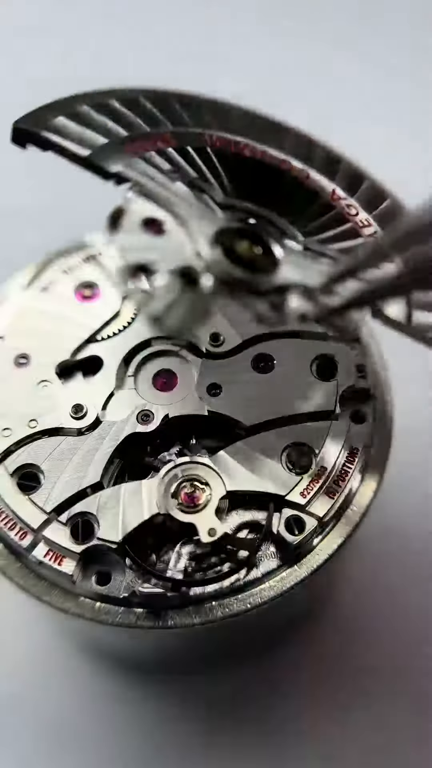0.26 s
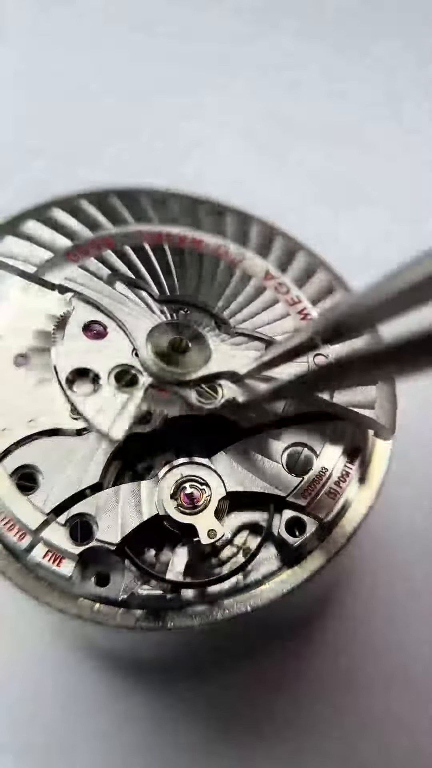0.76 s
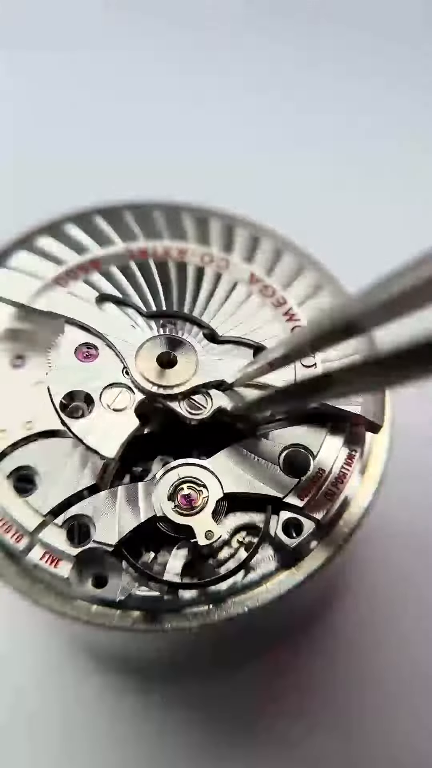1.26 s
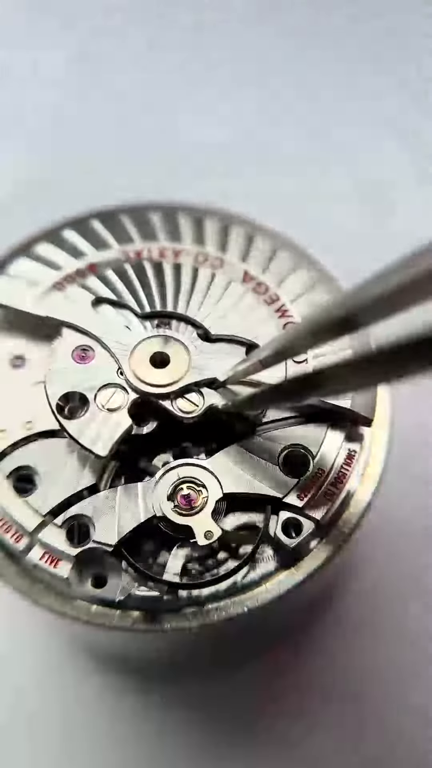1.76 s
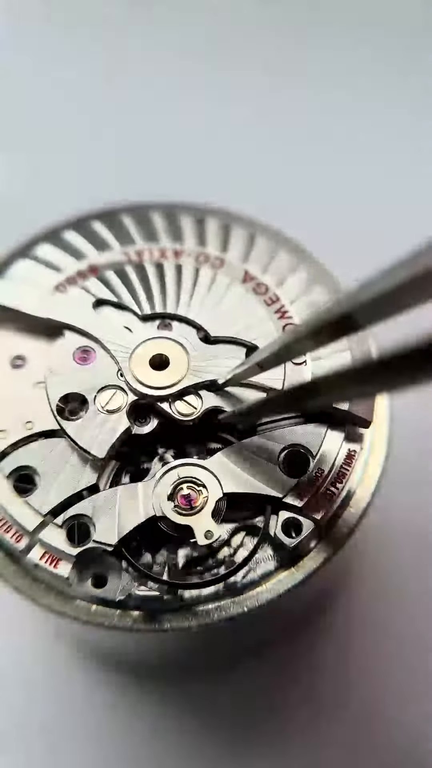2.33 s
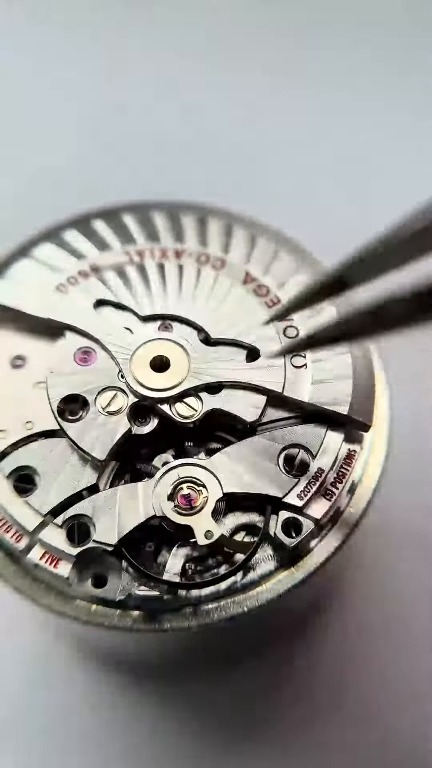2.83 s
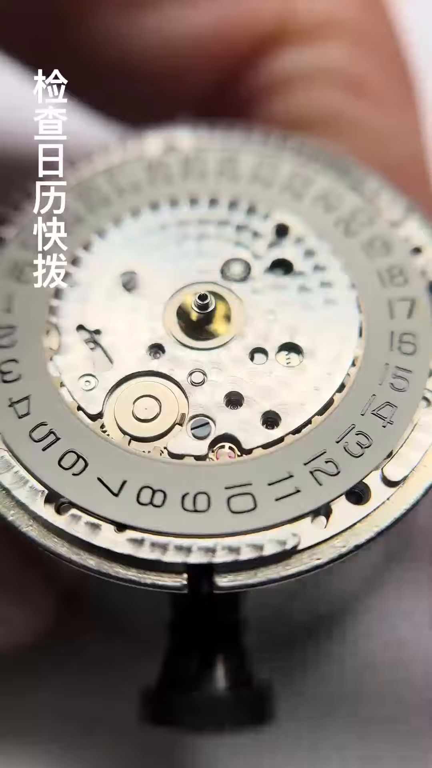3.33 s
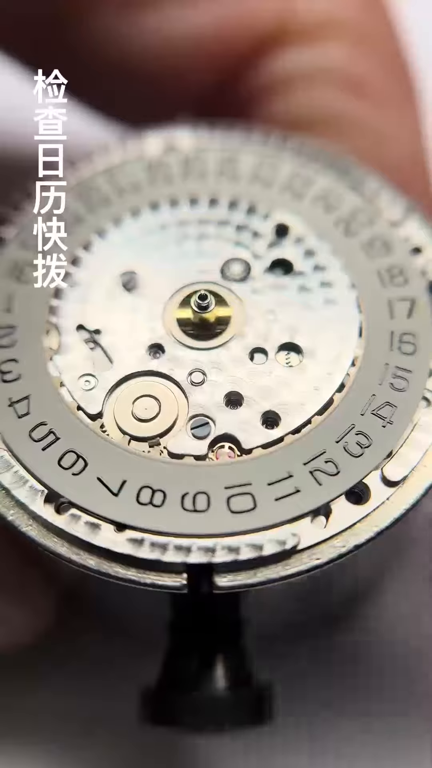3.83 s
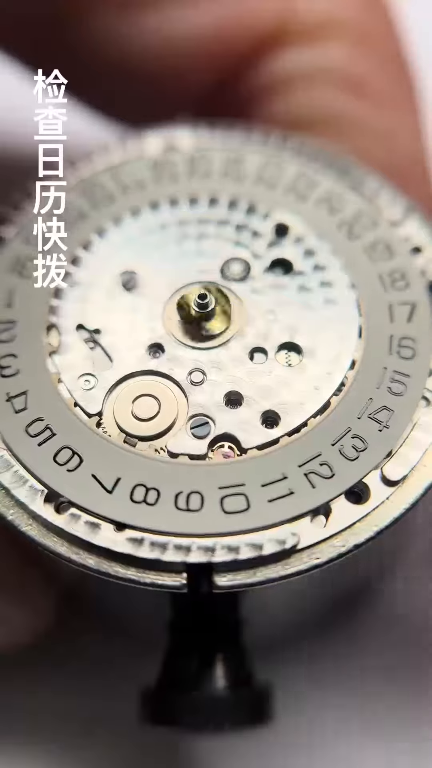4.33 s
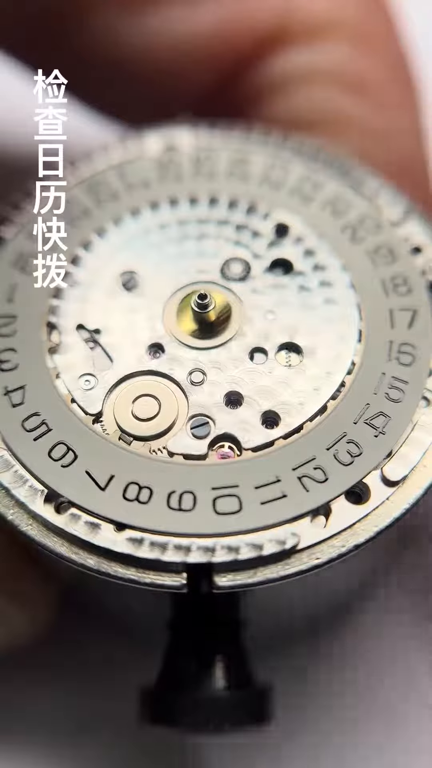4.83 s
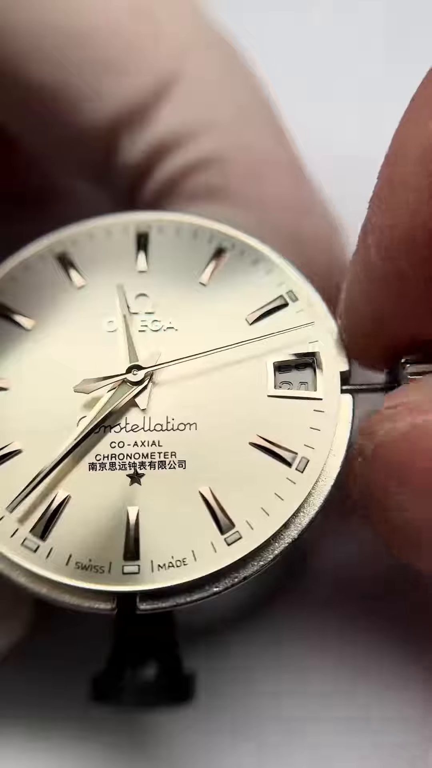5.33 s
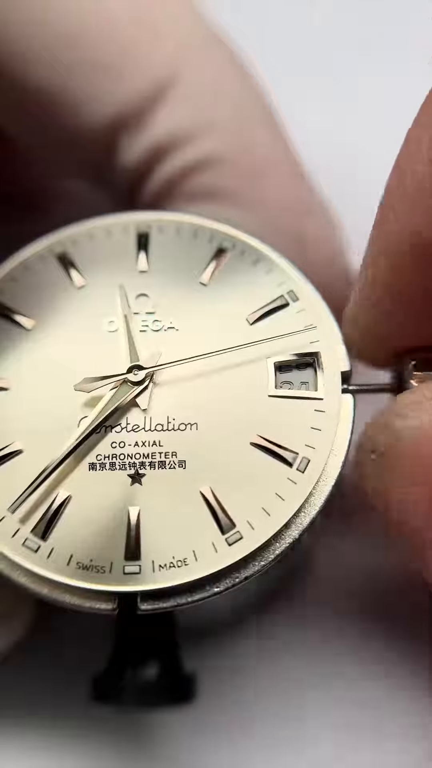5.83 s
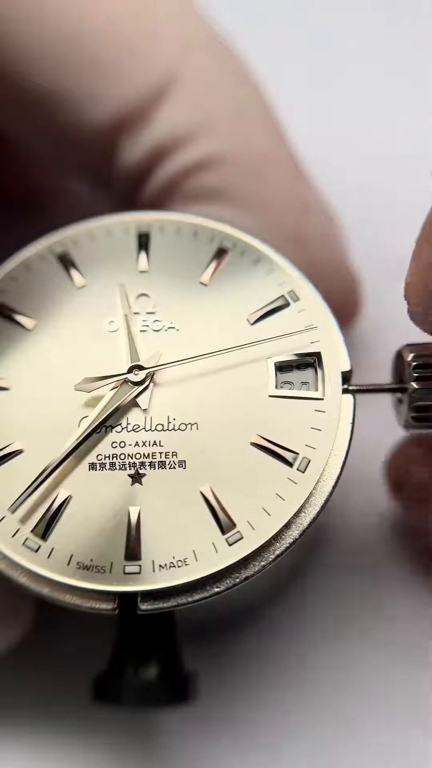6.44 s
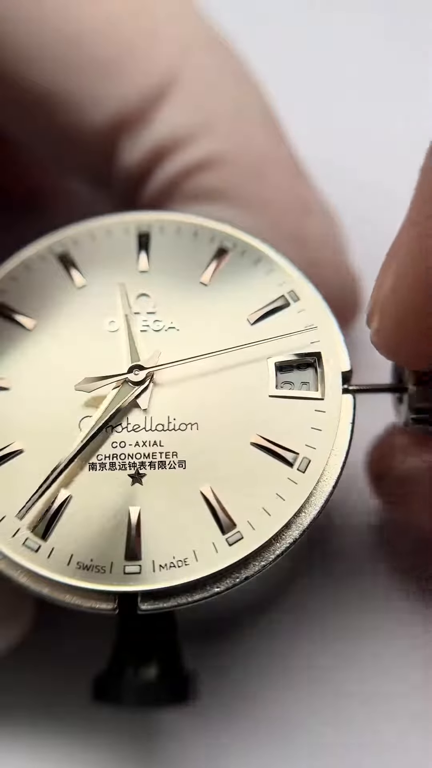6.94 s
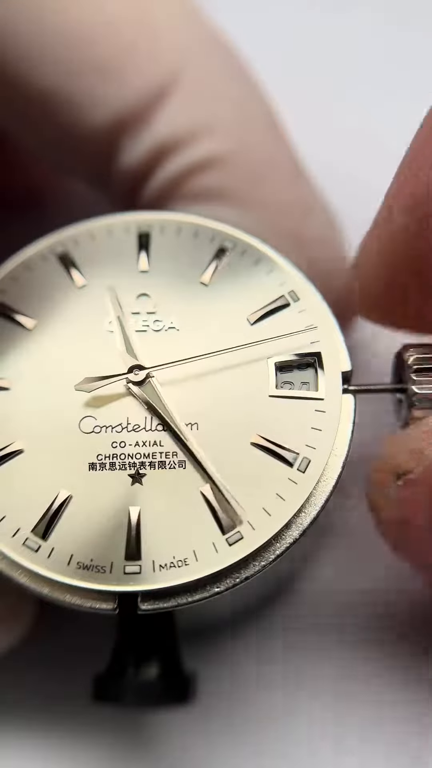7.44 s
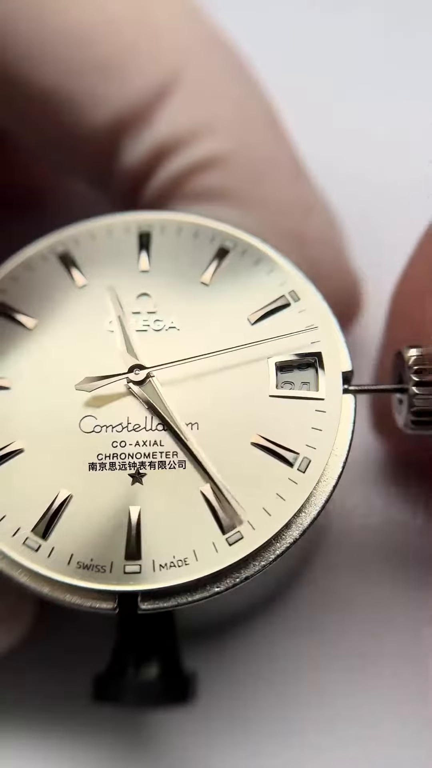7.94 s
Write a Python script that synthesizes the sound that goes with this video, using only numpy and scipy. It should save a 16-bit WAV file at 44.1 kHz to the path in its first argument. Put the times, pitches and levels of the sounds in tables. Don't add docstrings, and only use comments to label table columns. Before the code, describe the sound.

Close mono microphone in a dry, still room with a faint far fan. Delicate bright clinks, grazes and a short squeaky drag come irregularly over soft rapid ticking. Then small metal teeth snap past in bursts of four or five, with dull thumps from the hand-held holder between. Finally a single loud, very short metal snap, followed by soft skin rubs and barely audible ticks.

```python
import sys
import numpy as np
from scipy import signal
from scipy.fft import rfft, irfft
from scipy.io import wavfile
from scipy.ndimage import uniform_filter1d

SR = 44100
rng = np.random.default_rng(int(sys.argv[2]) if len(sys.argv) > 2 else 0)


def wav_record(signal):
    frames = np.transpose(np.atleast_2d(signal))
    bounded = np.clip(frames, -1, 1)
    quanta = np.round(bounded * 32767).astype(np.int16)
    wavfile.write(sys.argv[1], SR, quanta)


def field_ratio(decibels):
    return 10 ** (np.asarray(decibels, dtype=float) / 20)


N = 361179
T = np.arange(N) / SR
HZ = np.maximum(np.arange(N // 2 + 1) * SR / N, 1)

# [t/s, peak level/dB, low modes/dB, high modes/dB, rebound peak level/dB]
TEETH = [(2.9784, -22.5, -0.5, -1.5, -50), (3.024, -21.5, -2, -1, -38), (3.0618, -18.5, 3, 4, -39),
         (3.0931, -19.5, -1.5, 4.5, -40), (3.145, -23, 0, -1, -64), (3.5668, -23, 0, 7, -48),
         (3.5993, -20.5, 3.5, 2.5, -52), (3.6254, -21.5, -3, -2, -48), (3.659, -21.5, -3, -3, -48),
         (4.148, -24, 3, 4, -48), (4.2025, -23.5, 4, 3.5, -58), (4.2543, -20, 4.5, 0, -42),
         (4.3009, -20.5, -7, -3, -45), (4.368, -21.5, 1.5, 1.5, -56), (4.866, -18, 4, -4, -48),
         (4.9248, -20, -1.5, 2.5, -53), (4.9747, -21, -10, 5, -44), (5.0309, -22, 1, 3.5, -61),
         (5.113, -20.5, -7.5, -3.5, -63)]
# [stop t/s, restart t/s, fade-in/s]
CHANGES = [
    (2.923, 2.935, .03),
    (5.206, 5.22, .022),
]


def shaped(gain):
    spectrum = rng.standard_normal((len(HZ), 2)) @ [1, 1j]
    x = irfft(spectrum * gain, N)
    return x / x.std()


def colour(points):
    hz, db = np.transpose(points)
    return field_ratio(np.interp(np.log(HZ), np.log(hz), db, left=-150, right=-150))


def resonance(hz, width):
    return 1 / np.sqrt(1 + ((HZ - hz * hz / HZ) / width) ** 2)


def band(lo_hz, hi_hz):
    return 1 / np.sqrt((1 + (lo_hz / HZ) ** 8) * (1 + (HZ / hi_hz) ** 8))


def walk(rate):
    hold = int(SR / rate)
    steps = np.repeat(rng.standard_normal(N // hold + 1), hold)
    return uniform_filter1d(steps, hold)[:N]


def stroke(start, end):
    return np.sin(np.pi * np.clip((T - start) / (end - start), 0, 1))


def scene_index():
    return np.searchsorted([stop for stop, *_ in CHANGES], T)


def add(out, s, sound):
    i = int(s * SR)
    out[i:i + len(sound)] += sound[:N - i]


def contacts(rows, modes, tail_db, tail_s, seats=None):
    out, size = np.zeros(N), 4096
    lead = 200
    t = T[:size]
    hz, width, mode_db = (c[:, None] for c in np.transpose(modes))
    rate = 1.55 * np.pi * width
    dull = field_ratio(-5 * (hz[:, 0] > 9000))
    noise = rng.standard_normal((len(rows), 2 * size + 2 * len(modes)))
    seats = seats or [(0.98, 0.99, 0, 0)] * len(rows)
    for row, grit, (bend, mid_bend, third_db, after_db) in zip(rows, noise, seats):
        s, peak_db, low_db, high_db, ms, mid_db = row
        detune, strength = grit[2 * size:].reshape(2, -1, 1)
        regions = [hz < 2400, hz < 3000, hz < 6500, hz > 9000]
        tilt_db = np.select(regions, [low_db, low_db + third_db, mid_db, high_db]) + 1.5 * strength

        level = field_ratio(mode_db + tilt_db + after_db * (width < 30))
        swelling = level * rate ** 2 * t * np.exp(-rate * t)
        pitch = hz * np.select([hz < 2400, hz < 6500], [bend, mid_bend], 1)
        pitch = pitch + np.minimum(.012 * hz, width / 2) * detune
        rings = rfft(swelling * np.sin(2 * np.pi * pitch * t))

        u = t / (max(ms, .05) / 3000)
        blow = rfft(u * np.exp(1 - u) * grit[:size])
        power = np.abs(blow) ** 2
        blow = blow / np.sqrt(uniform_filter1d(power, size=31) / power.mean() + .15)
        rattle = rfft(field_ratio(tail_db) * np.exp(-t / tail_s) * grit[size:2 * size])

        ring_power, blow_power = np.abs(rings) ** 2, np.abs(blow) ** 2
        share = np.sqrt(blow_power.mean() * ring_power.sum(axis=1) / (ring_power @ blow_power))
        sound = irfft(blow * (share @ rings) + rattle * (dull @ rings))
        sound = np.roll(sound, lead)
        sharpest = sound[np.abs(sound).argmax()]
        add(out, s - lead / SR, -sound * field_ratio(peak_db) / sharpest)
    return out


def room():
    # [f/Hz, level per Hz/dB]
    air = [(41, -31.5), (70, -7.5), (152, -9), (351, -8.5), (431, -5), (635, -8.5), (744, -5.5), (853, -9),
           (1580, -20), (1930, -18), (2600, -29), (14900, -29), (16000, -39)]
    # [f/Hz, width/Hz, rms level/dB]
    fan_tones = [(147, -70.5), (762, 24, -74)]
    (low_hz, low_db), (hz, width, db) = fan_tones
    low = np.sin(2 * np.pi * np.cumsum(low_hz + 1.5 * walk(20)) / SR)
    low = low * field_ratio(low_db + 1.4 * walk(3.9))
    low_scene_db = np.array((-22, 2, -0.5))
    fan = low * field_ratio(low_scene_db[scene_index()]) + field_ratio(db) * shaped(resonance(hz, width) ** 2)
    return field_ratio(-68 + 1.0 + 0.51 * walk(2.5)) * shaped(colour(air)) + fan


def hands():
    # [t/s, sway level/dB]
    sway_points = [(0, -62.5), (.3, -60), (.7, -64), (.85, -63.5), (1.12, -63), (1.3, -64.5), (2.8, -59),
                   (3.08, -49.5), (3.36, -53), (3.6, -48.5), (4.1, -51.5), (4.27, -49), (4.55, -49),
                   (5.02, -51), (5.47, -54.5), (7.2, -59.5), (7.6, -56), (7.85, -61)]
    # [start t/s, end t/s, rub level/dB, airy top level/dB]
    slides = [(-.25, 0.343, -72.5, -65), (0.137, 0.738, -69, -74), (1.112, 1.813, -69, -76),
              (1.697, 2.106, -65, -68), (2.05, 2.45, -72, -77), (2.5, 2.85, -71, -72),
              (2.72, 3.057, -64, -61), (3.15, 3.433, -77.5, -73), (4.35, 4.73, -73, -81),
              (4.513, 4.595, -80, -63), (5.194, 5.33, -68, -64), (5.234, 5.578, -72, -67),
              (5.55, 5.72, -68, -95), (5.672, 5.987, -67.5, -57), (5.956, 6.114, -73.5, -75),
              (6.19, 6.599, -73.5, -75), (7.298, 7.529, -75, -72), (7.903, 8.299, -76, -91)]
    # [f/Hz, level per Hz/dB]
    skin = [(1000, 9), (1700, -0.5), (2600, -2.5), (3400, -2.5), (4400, -3.5), (6200, -3.5), (7400, -3.5),
            (8500, -2), (9800, -12.5), (12000, -9.5), (14100, -8.5), (15700, -11)]
    index = scene_index()
    grip_db = np.array((-63, -66.5, -78.5))
    rest_db = np.array([(-72, -77.5, -78), (-83, -78, -90)])

    sway = field_ratio(np.interp(T, *np.transpose(sway_points)))
    grip = np.hypot(field_ratio(grip_db[index]), sway * field_ratio(-15.5))
    rub, top = field_ratio(rest_db[:, index]) ** 2
    for start, end, rub_db, top_db in slides:
        swell = stroke(start, end) ** 2
        rub = rub + swell * field_ratio(rub_db) ** 2
        top = top + swell * field_ratio(top_db) ** 2
    grain = field_ratio(0.92 * walk(61))

    creak = band(89, 2100) * (HZ ** -.7 + 0.023 * resonance(262, 86))
    out = field_ratio(5.0) * sway * field_ratio(2.0 * walk(9.6)) * shaped(band(4.5, 70) * HZ ** -1.1)
    out += field_ratio(-1.0) * grip * field_ratio(2.0 * walk(25)) * shaped(creak)
    out += field_ratio(1.0) * np.sqrt(rub) * grain * shaped(band(1300, 5500) * colour(skin))
    out += field_ratio(-4.5) * np.sqrt(top) * grain * shaped(band(6500, 18000) * colour(skin))
    return out


def escapement():
    # [first beat t/s, end t/s]
    runs = [
        (.0458, 2.92),
        (3.032, 5.2),
    ]
    # [f/Hz, width/Hz, level/dB]
    modes = [(4300, 490, -42), (7700, 860, 13), (9400, 3100, 15), (12740, 960, 20.5), (12370, 4400, 24.5),
             (15000, 1600, -3.5), (12200, 45, -10)]
    beat_s, limp_s = 1 / 7, .002
    rows = []
    for (first, end), db in zip(runs, (-52, -47)):
        for k, s in enumerate(np.arange(first, end, beat_s)):
            s += limp_s * (k % 2)
            rows.append((s, db, 0, 0, 1.5, 0))
            rows.append((s + 0.0028, db - 17, 0, 0, 2.5, 0))
    return contacts(rows, modes, tail_db=-1.5, tail_s=0.0057)


def tweezers():
    # [t/s, peak level/dB, low modes/dB, high modes/dB, middle modes/dB]
    taps = [(0.4904, -23, -18, -2.5, -4), (0.4937, -30, -3, 2, 8), (0.7981, -43.5, 6, -3, 3),
            (0.8126, -24.5, -4, 3, 5), (1.1747, -47, 2, -11, -4), (1.6743, -36.5, 11, -1, 5),
            (1.6787, -29, -1.5, -6, 0.5), (1.683, -24, -4.5, -2.5, 3.5), (2.0466, -35.5, 2, -8, 1.5),
            (2.2016, -31, -4, -6, -3), (2.206, -33.5, 2, 0, 2), (2.209, -48, -2, -9, 1),
            (2.236, -28.5, -16, -12, -5), (2.2434, -29, -18, -3, -1), (2.2523, -24, -1.5, 2, 3.5),
            (2.2594, -31.5, 8, 7, 10), (2.263, -44, 8, -9, 4), (2.3501, -32, 0.5, 3, 5.5),
            (2.589, -41, 5, -14, 7.5), (2.6212, -47.5, -1, -4, 2)]
    tap_ring_hz = [4130, 4200, 4250, 4300, 4000, 3900, 3900, 3830, 4000, 4000, 4000, 4000, 3960, 3900, 3850,
                   3900, 4000, 3840, 4000, 4000]
    # [t/s, peak level/dB, low modes/dB, high modes/dB]
    grazes = [(0.0774, -46.5, 9, 1), (.162, -54, -9, 12), (.174, -53, -9, 11), (.531, -56, -6, -10),
              (.61, -51, 9, -12), (0.7298, -48, 4, -10), (.7617, -50, 10, 7), (1.1628, -53, 0, -8),
              (1.416, -58, -13, -17), (1.452, -66, -13, -8), (2.3225, -54, -3, -8), (2.374, -45, 5, -9),
              (2.4219, -56, 2, 0), (2.6574, -50, -2, -9)]
    # [f/Hz, width/Hz, level/dB]
    modes = [(1500, 920, -3.5), (1876, 190, 1), (4000, 504, 3), (4450, 370, -7), (4800, 350, -12),
             (7560, 1120, -5.5), (12180, 590, -1.5), (13300, 1320, -7.5), (14900, 700, -61),
             (7900, 140, -10)]
    tap_ms, softer_ms_per_db, firm_db = 0.9, 1.2, -39.5
    rows = []
    for s, db, low_db, high_db, mid_db in taps:
        ms = tap_ms + softer_ms_per_db * max(firm_db - db, 0)
        rows.append((s, db, low_db, high_db, ms, mid_db))
    rows += [(*graze, 1.5, 2) for graze in grazes]
    seats = [(1, hz / 4000, 0, 0) for hz in tap_ring_hz]
    seats += [(0.95, 1, 0, 0)] * len(grazes)
    return contacts(rows, modes, tail_db=-10.5, tail_s=0.0029, seats=seats)


def knocks():
    # [t/s, peak level/dB, f/Hz, polarity]
    jolts = [(0.492, -39.5, 277, 1), (.722, -40.5, 260, 1), (0.736, -41, 267, -1), (0.749, -45, 264, 1),
             (0.813, -42, 263, 1), (1.683, -37, 247, -1), (2.047, -40, 262, 1), (2.201, -43, 280, 1),
             (2.237, -39, 292, -1), (2.253, -36, 310, 1), (3.076, -38, 153, 1), (3.105, -40, 174, 1),
             (3.107, -40.5, 470, 1), (3.147, -38, 493, -1), (3.466, -64, 60, -1), (3.477, -29, 28, 1),
             (3.479, -32.5, 463, 1), (3.635, -36, 480, 1), (3.768, -38.5, 483, 1), (4.021, -25.5, 35.8, 1),
             (4.302, -41, 520, 1), (4.446, -39, 211, -1), (4.462, -43, 218, 1), (4.598, -39, 90, -1),
             (4.753, -33, 49, 1), (4.773, -37.5, 69.6, -1), (4.978, -40, 507, 1), (5.572, -37, 29.9, 1),
             (5.57, -36.5, 75, -1), (7.94, -49, 60, 1), (7.48, -47.5, 89.8, 1)]
    out, t = np.zeros(N), T[:8192]
    for s, db, hz, sign in jolts:
        push = 1 - np.exp(-t / 0.001)
        swing = np.cos(2 * np.pi * hz * t) * np.exp(-t * (hz * 0.62 + 75)) * push
        add(out, s, np.sign(sign) * field_ratio(db) * swing)
    load_db, load_s, release_s = -41, .011, 0.004
    lag = t - t[-1] / 2
    lean = -field_ratio(load_db) * np.exp(-np.abs(lag) / np.where(lag < 0, load_s, release_s))
    for s, *_ in TEETH:
        add(out, s - t[-1] / 2, lean)
    return out


def brushes():
    # [start t/s, end t/s, rms
    # level/dB, f/Hz, width/Hz]
    touches = [(0.585, 0.64, -70, 4300, 900), (0.59, 0.648, -65, 1900, 600), (.71, 0.806, -71, 2280, 900),
               (5.214, 5.483, -72, 8400, 1500), (5.57, 5.652, -68, 4840, 1500),
               (5.698, 6.003, -64.5, 2620, 1900), (6.235, 6.283, -71.5, 2960, 2020),
               (6.351, 6.416, -73, 5300, 1500), (6.354, 6.41, -73, 8500, 2500),
               (6.48, 6.69, -73.5, 3150, 1210), (6.654, 6.968, -78, 3100, 2000),
               (7.127, 7.338, -74.5, 3100, 1600), (7.58, 7.616, -76, 5510, 4000),
               (7.34, 7.5, -71.5, 2500, 2000), (5.273, 5.53, -60, 90, 62.4),
               (3.517, 3.545, -68, 7500, 7000), (4.864, 4.888, -51, 1240, 350)]
    out = np.zeros(N)
    for start, end, db, hz, width in touches:
        out += field_ratio(db) * stroke(start, end) ** 0.54 * shaped(resonance(hz, width) ** 2)
    return out * field_ratio(2.0 * walk(87))


def drag():
    # [f/Hz, width/Hz, level/dB]
    modes = [(1270, 140, -1.5), (1315, 60, -14), (4000, 1700, -13), (7960, 1500, -16)]
    start_s, catch_s = 1.178, .012
    slacken_db_per_s = (140, 55, 70.4, 79)
    catch_db = -51.5 - 8 * (np.clip(start_s - T, 0, .1) / catch_s) ** 2
    late = np.maximum(T - start_s, 0)
    squeak = np.zeros(N)
    for (hz, width, db), fade in zip(modes, slacken_db_per_s):
        squeak += field_ratio(db - fade * late) * shaped(resonance(hz, width) ** 2)
    return squeak * field_ratio(catch_db + 3.1 * walk(69.8))


def date_ring():
    # [lowest ring f/Hz, third ring/dB, middle rings/dB, rebound delay/ms, after-ring/dB]
    seating = [(1600, -1, 1, 19, 0), (1690, 3.5, -0.5, 15, 6), (1840, 0.5, 0, 13.5, -2),
               (1650, 1, 0, 16, 2), (1560, 0, 3.5, 13, 0), (1540, -4, 1, 14, -4), (1610, -3, -1, 11, -3),
               (1700, 1, -2, 13, -6), (1570, 2, 2, 16, -10), (1640, 3, 2, 19, -6), (1660, -7, -1, 13, 0),
               (1750, 0.5, -1, 15, -2), (1820, -3, -8, 13, -8), (1530, -7, -2.5, 11, -10),
               (1904, -1.5, -7, 33, 0), (1560, -4, 0, 18, -1), (1590, -9, 3, 16, 2), (1660, 2, 0, 13, -5),
               (1580, 2.5, -0.5, 13, -12)]
    # [t/s, peak level/dB, low modes/dB,
    # high modes/dB]
    slips = [(3.1204, -51, -6, 8), (3.275, -50.5, 11, -6), (3.469, -34.5, 12.5, -17), (3.479, -36, 10, -8),
             (3.527, -45.5, 2, -6), (3.535, -49, 6, -7), (3.765, -46, -1, 0), (3.768, -44, 5, -5),
             (3.772, -51, 0, 0), (3.778, -41, -13, 4), (3.781, -48, -6, 5), (4.0698, -58, -6, 0),
             (4.0865, -46, -2, -16), (4.221, -48, 2, -4), (4.319, -39, 2, -2), (4.43, -49, 11, -10),
             (4.454, -41.5, 2.5, -11), (4.5586, -44, 8, 2), (4.565, -49, 0, 5), (4.571, -47, 8, 2),
             (3.545, -55, 3, 0), (4.157, -48, 6, -3), (4.7971, -54, -4, 8), (4.814, -41.5, 4, 3),
             (4.8696, -21, 5, 8.5), (4.873, -35, -2, -15), (5.0533, -46, 2, -8)]
    # [f/Hz, width/Hz, level/dB]
    modes = [(1600, 360, -0.5), (2150, 370, -14), (2936, 460, -9), (4600, 450, 1), (6150, 450, -6),
             (7965, 1210, -1), (11780, 990, -3.5), (13460, 1700, 0), (14600, 560, -31), (7240, 12, -11),
             (7300, 140, -2), (9200, 77, -9.5), (11100, 14, -15)]
    tooth_ms, tooth_mid_db = 1.48, -6
    rebound_low_db, rebound_high_db, rebound_ms = 5.5, -4, 1.4
    snaps, seats, loose = [], [], []
    for tooth, (ring_hz, third_db, mid_db, delay_ms, after_db) in zip(TEETH, seating):
        s, db, low_db, high_db, rebound_db = tooth
        snaps.append((s, db, low_db, high_db, tooth_ms, tooth_mid_db + mid_db))
        seats.append((ring_hz / 1600, 1, third_db, after_db))
        loose.append((s + delay_ms / 1000, rebound_db, rebound_low_db, rebound_high_db, rebound_ms, 0))
    loose += [(*slip, 0.8, 0) for slip in slips]
    out = contacts(snaps, modes, tail_db=-20.5, tail_s=0.0064, seats=seats)
    return out + contacts(loose, modes, tail_db=-19.5, tail_s=0.0062)


def crown():
    # [t/s, peak level/dB, low modes/dB, high modes/dB, chatter/ms]
    pulls = [
        (5.533, -57.5, 10, -11, 2),
        (5.5685, -17.5, 7.5, -4, 0.55),
        (5.5684, -3.5, 0, -3, 0.088),
        (5.569, -24, 3, -2, 1.8),
        (7.397, -54.5, 15.5, -2.5, 2.7),
        (7.79, -58.5, -8, 2, 1.1),
        (7.1, -61, -9, 2, 1.8),
        (5.415, -60, -12, 18, 1.8),
    ]
    # [f/Hz, width/Hz, level/dB]
    modes = [(197, 120, -1), (305.6, 53, -7.5), (955, 45, -4), (1450, 200, -3.5), (1900, 250, 1),
             (3150, 600, -2), (5247, 1010, 2.5), (6840, 410, -19), (7970, 800, -2), (8450, 340, -8.5),
             (11200, 900, -17), (13600, 430, -15), (14900, 600, -21)]
    return contacts([(*row, 0) for row in pulls], modes, tail_db=-55.5, tail_s=.012)


def scene():
    bench = room() + hands() + escapement() + tweezers() + knocks()
    bench += brushes() + drag() + date_ring() + crown()
    return bench[None]


def top_cut(x):
    return signal.sosfilt(signal.butter(12, 16720, fs=SR, output="sos"), x)


def record(dry):
    gate = np.ones(N)
    for stop, restart, fade in CHANGES:
        gate *= np.where(T < stop, 1, np.clip((T - restart) / fade, .02, 1))
    shelf = signal.firwin2(257, [0, 15450, 15750, SR / 2], [1, 1, .1, .05], fs=SR)
    mix = signal.oaconvolve(dry * gate, shelf[None], mode="same")
    return top_cut(mix)


dry = scene()
out = record(dry)
wav_record(out)
```